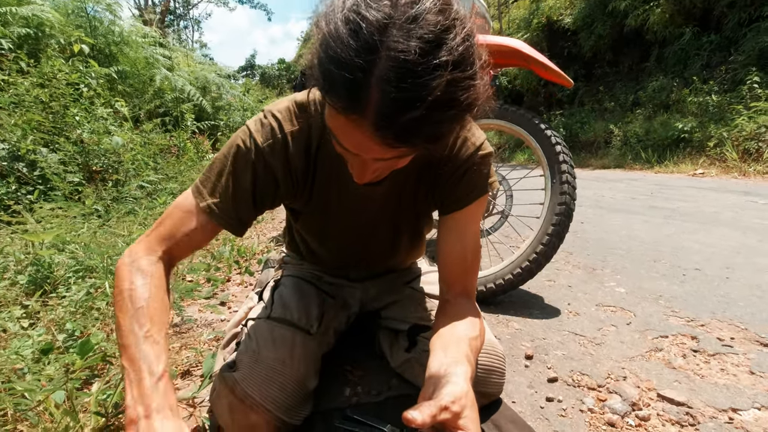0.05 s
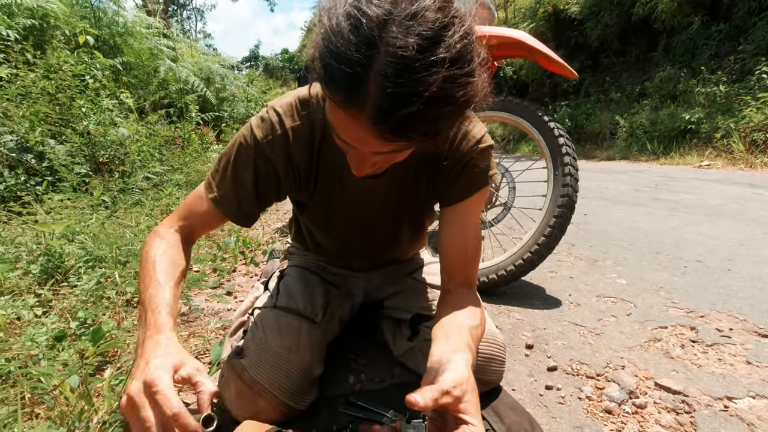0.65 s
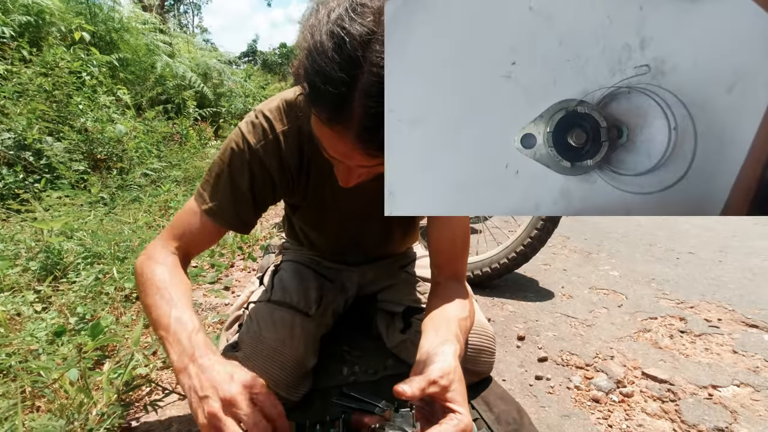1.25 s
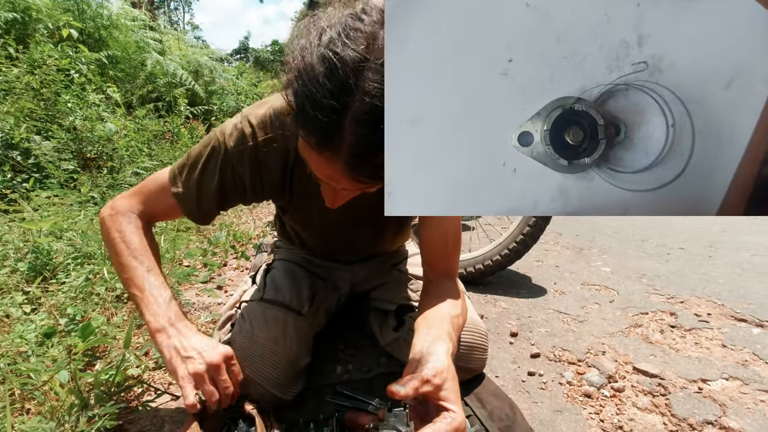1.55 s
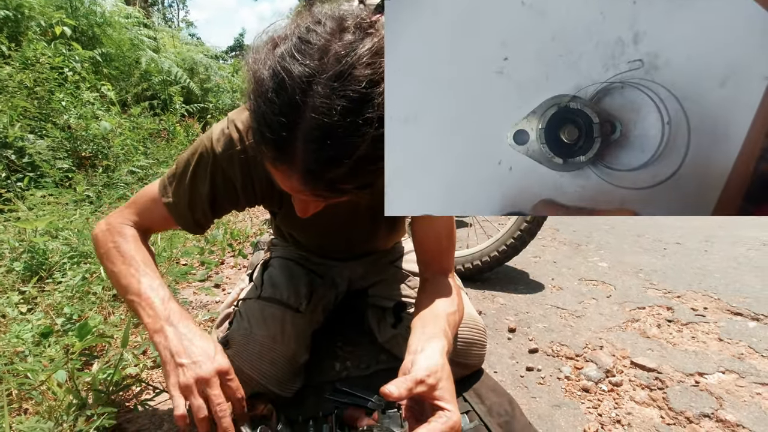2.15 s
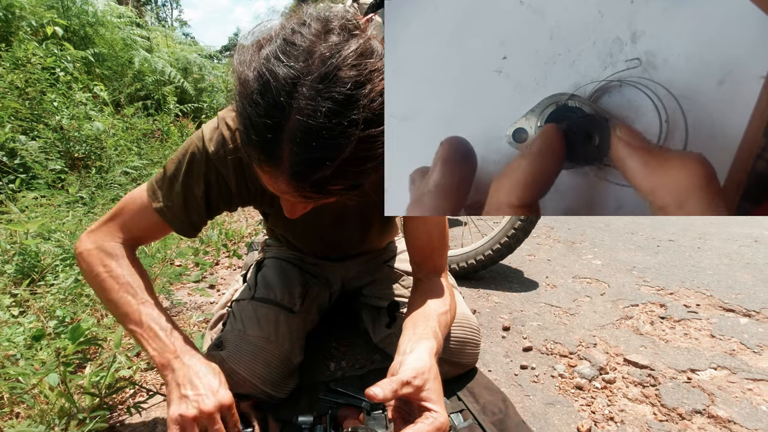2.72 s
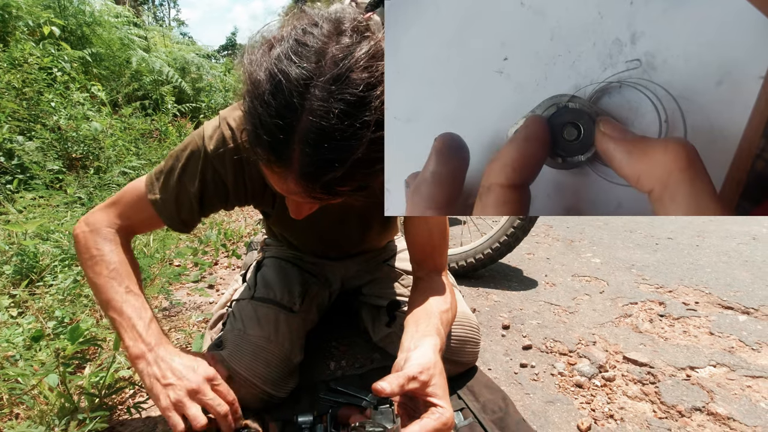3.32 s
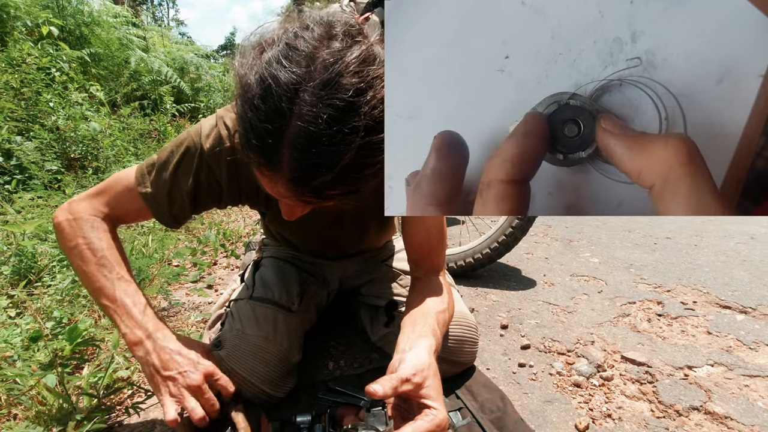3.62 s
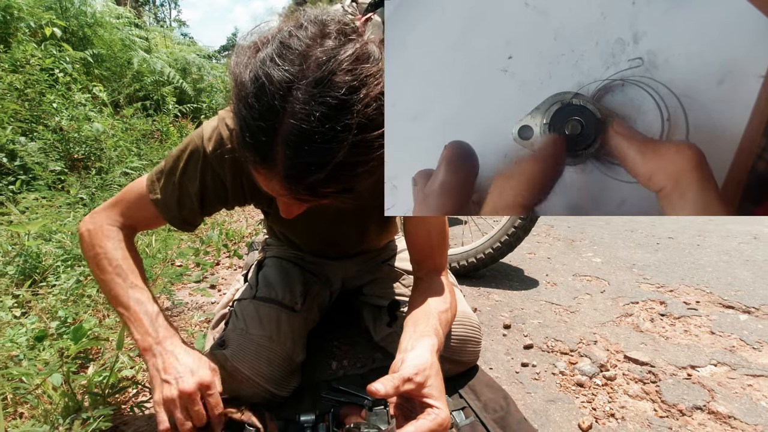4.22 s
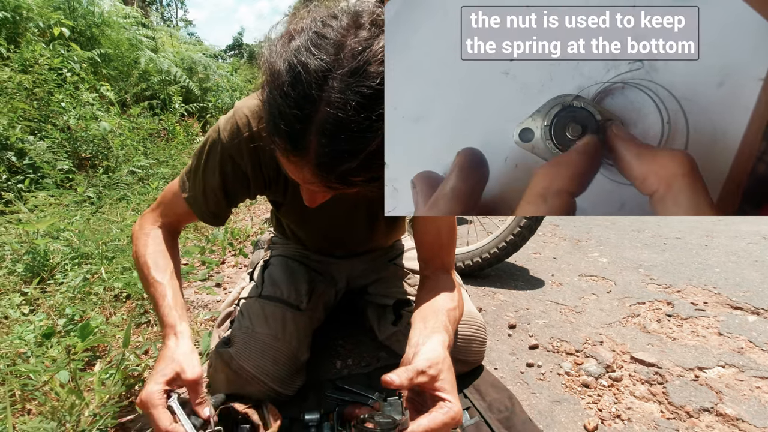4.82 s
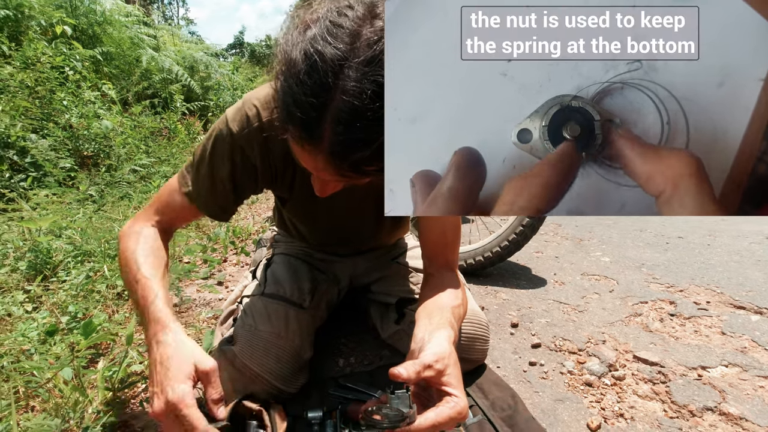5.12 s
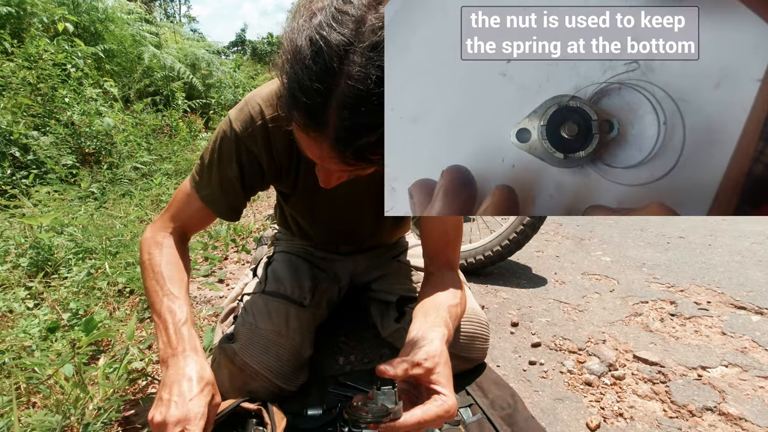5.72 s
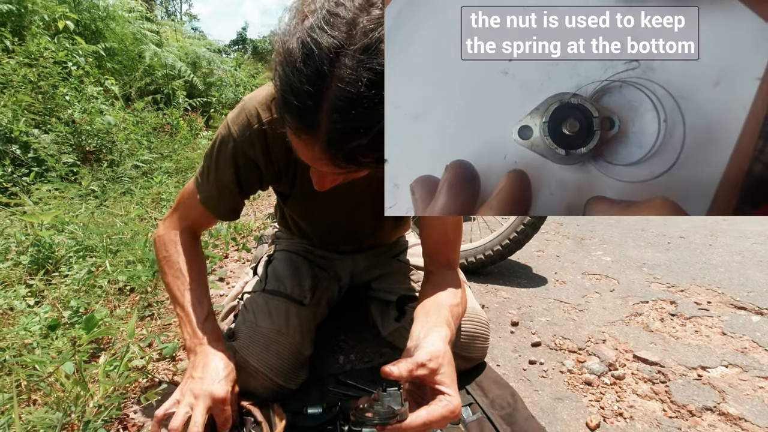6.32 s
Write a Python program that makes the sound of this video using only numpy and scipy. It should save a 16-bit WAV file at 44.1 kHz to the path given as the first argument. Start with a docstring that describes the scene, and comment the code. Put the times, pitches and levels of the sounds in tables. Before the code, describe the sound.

Fingers sort through small steel nuts and washers in a pouch, close to the microphone. A few ticks and a light clink open the sound, followed by a lull in which a far cricket pips three times, very faintly, around 1 second. At about 1.4 seconds the hand bumps softly on the ground and the sorting resumes. From 2 to 5 seconds it is busier: irregular damped clacks, short gritty scrapes and brief high rings, with sharper clinks near 2.6, 3.7 and 4.7 seconds. At about 5.2 seconds something comes down with a hard, hollow knock, the loudest moment, and settles in weakening impacts over a third of a second. From 5.9 to 6.5 seconds the hand rubs the pouch in three soft, dull drags with light taps. Very faint wind and insects continue throughout, with almost no echo.

```python
"""Small steel nuts and washers tick and scrape as fingers sort through them in a pouch, close by.
Parts held in the heap are damped and only clack; those that come free ring briefly in their own modes.
The hand bumps the ground now and then. One load knocks down hard and settles in ever weaker impacts,
and the hand then rubs over the pouch in dull slips of friction.
Behind lies a quiet roadside: light wind, faint insects and three pips of a far cricket."""
import sys
import numpy as np
from scipy import signal
from scipy.fft import rfft, irfft, next_fast_len
from scipy.io import wavfile
from scipy.ndimage import uniform_filter1d, map_coordinates

SR = 44100
rng = np.random.default_rng(int(sys.argv[2]) if len(sys.argv) > 2 else 0)


def master(y):
    """Save y as 16-bit WAV."""
    cut = np.clip(np.atleast_2d(y).T, -1, 1)
    pcm = np.round(cut * 32767)  # scale
    wavfile.write(sys.argv[1], SR, pcm.astype(np.int16))


N = 289277


def amp(db):
    """Amplitude ratio of a level in decibels."""
    return 10 ** (np.asarray(db) / 20)


def unit(x):
    """Normalisation to rms 1."""
    return x / np.sqrt(np.mean(x ** 2) + 1e-20)


def along(points, hz):
    """Interpolation of (f/Hz, value) points on a logarithmic frequency axis."""
    f, values = np.transpose(points)
    return np.interp(np.log(hz + 1), np.log(f + 1), values)


def wobble(rate):
    """Slow random modulation: a spline through `rate` random values a second."""
    knots = rng.standard_normal(int(N * rate / SR) + 4)
    return map_coordinates(knots, [np.arange(N) * rate / SR])


def filtered(x, response):
    """Linear filtering: the spectrum is multiplied by a frequency response."""
    size = next_fast_len(N + SR // 4)
    return irfft(rfft(x, size) * response(np.fft.rfftfreq(size, 1 / SR)), size)[..., :N]


def add(track, s, sound):
    """Superposition of a sound on the track from time s."""
    start = round(s * SR)
    track[:, start:start + sound.shape[1]] += sound[:, :N - start]


# Likeness of left and right: f/Hz, coherence
COHERENCE = [(30, 0.25), (110, 0.5), (280, 0.76), (1500, 0.78), (3000, 0.35), (5000, 0.17), (12000, 0.18)]

def spread(pair, hz):
    """Partial coherence: two independent spectra mix as mid and side into left and right."""
    angle = np.arccos(np.clip(along(COHERENCE, hz), -1, 1)) / 2
    mid, side = pair[0] * np.cos(angle), pair[1] * np.sin(angle)
    return np.array([mid + side, mid - side])


# Phase lead of the left microphone port over the right: f/Hz, phase/rad
PORT_LEAD = [(300, 0), (1300, -.35), (2900, 1.15), (4100, 1.5), (5500, .8), (7100, 1.4), (7700, 2.7),
             (9050, 1.4), (10300, 1.9), (12700, 2.7), (14000, 1.8), (15300, 2.1)]

def aside(x, offset, width):
    """Phase difference: a source off to one side reaches the two ports out of step."""
    centre = x.mean(axis=0)
    image = centre + width * (x - centre)
    return filtered(image, lambda hz: np.exp(.5j * offset * along(PORT_LEAD, hz) * np.array([[1], [-1]])))


def coloured(pair, spectrum, patchy_db=0):
    """Spectral shaping: two independent signals become stereo of rms 1, with passing resonances."""
    hz, _, z = signal.stft(pair, SR, nperseg=1024)
    patches = uniform_filter1d(rng.standard_normal(z.shape[1:]), size=7, axis=0)
    patches = unit(uniform_filter1d(patches, size=4, axis=1))
    z = spread(z.transpose(0, 2, 1), hz) * amp(along(spectrum, hz) + patchy_db * patches.T)
    return unit(signal.istft(z.transpose(0, 2, 1), nperseg=1024)[1][:, :N])


def stick_slip(rate, scatter_db, hiss):
    """Stick-slip friction: random impulses of uneven size over the noise of smooth sliding."""
    slips = (rng.random(N) < rate / SR) * amp(scatter_db * np.clip(rng.standard_normal(N), -2, 2))
    return unit(slips * rng.choice([-1, 1], (2, N))) + hiss * rng.standard_normal((2, N))


def strokes(rows, attack_s, sag_db_per_s, release_t60, linger_db, linger_t60):
    """Exponential envelopes: strokes swell, sag, die away and add in power; one gain per level column."""
    grid = np.arange(0, N / SR, .001)
    start, length, *levels = np.transpose(rows)[:, :, None]
    t = grid - start
    after = np.maximum(t - length, 0)
    push = amp(60 * np.minimum(t, 0) / attack_s - sag_db_per_s * np.clip(t, 0, length))
    shape = push * (amp(-60 * after / release_t60) + amp(linger_db - 60 * after / linger_t60))
    return [np.interp(np.arange(N) / SR, grid, np.linalg.norm(amp(db) * shape, axis=0)) for db in levels]


def impact(spectrum, tilt_db, rattle, t60, hollow_hz=1000, hollow_db=0, ripple_db=4.0,
           settle_db=-17, settle_t60=0.19, size=4096):
    """Source and filter: an impulse and a decaying rattle excite a body that varies each time; peak 1."""
    hz, t = np.fft.rfftfreq(size, 1 / SR), np.arange(size) / SR
    force = rng.standard_normal((2, size)) * (amp(-60 * t / t60) + amp(settle_db - 60 * t / settle_t60))
    force *= rattle / np.linalg.norm(force[0])
    force[0, 0] += 1
    octaves = np.log2(np.maximum(hz, 500) / hollow_hz)
    hollow = np.exp(-(octaves / 0.15) ** 2)
    ripple = unit(uniform_filter1d(rng.standard_normal(len(hz)), size=40))
    body_db = along(spectrum, hz) + tilt_db * octaves + hollow_db * hollow + ripple_db * ripple
    cepstrum = irfft(np.log(amp(body_db)))
    body = np.exp(rfft(2 * cepstrum[:size // 2], size))  # minimum phase, hence causal
    fade = np.cos(.5 * np.pi * t / t[-1])
    sound = irfft(spread(rfft(force), hz) * body) * fade
    return sound / np.abs(sound).max()


# Low rumble of light wind and of the handling: t/s, level/dB
LOW_RUMBLE = [(0.0, -70), (0.6, -73.5), (1.11, -64.5), (2.7, -75), (2.92, -75), (3.1, -67), (3.27, -80),
              (3.53, -70.5), (3.63, -69.5), (4.05, -74), (4.64, -66), (5.11, -67), (5.54, -79), (6.56, -83)]
# Spectra of still air, rumble and insects: f/Hz, level/dB
AIR_SPECTRUM = [(88, -29), (150, -0.5), (296, -8.5), (388, -5.5), (583, -6.5), (751, -8.5), (1630, -9.5),
                (2650, -15.5), (5230, -21), (6350, -18.5), (7710, -26.5), (12000, -32), (13000, -37),
                (15500, -36)]
RUMBLE_SPECTRUM = [(12, -32.5), (20, 14), (42, 13.5), (134, -1.5), (259, -8), (300, -9), (390, -35.5),
                   (660, -120)]
INSECT_SPECTRUM = [(2000, -67), (2600, -6), (2900, -8.5), (3200, -11), (3800, -51)]

def roadside(air_db=-74, insects_db=-79):
    """Shaped noise: still air, a low rumble of light wind and handling, and far, wavering insects."""
    swell = amp(np.interp(np.arange(N) / SR, *np.transpose(LOW_RUMBLE)))
    air = amp(air_db) * coloured(rng.standard_normal((2, N)), AIR_SPECTRUM, patchy_db=4.5)
    rumble = swell * amp(3 * wobble(9)) * coloured(rng.standard_normal((2, N)), RUMBLE_SPECTRUM)
    chorus = amp(1.5 * wobble(5)) * coloured(rng.standard_normal((2, N)), INSECT_SPECTRUM, patchy_db=3)
    return air + rumble + amp(insects_db) * chorus


# Damped contacts in the heap: t/s, level/dB, tilt/(dB per octave), hollow resonance f/Hz
HEAP_CONTACTS = [(.032, -34.5, -7.5, 3100), (.04, -35, -5.5, 3190), (0.153, -37.5, 3.5, 2900),
                 (1.343, -41, -7.5, 820), (1.546, -36, -1.5, 3320), (1.554, -44, -3.5, 3230),
                 (1.716, -36.5, -6, 1740), (1.749, -37.5, -5.5, 3300), (1.875, -47, -2, 3800),
                 (2.114, -31.5, -4.5, 2376), (2.193, -21, 2, 3160), (2.434, -29, -4, 935),
                 (2.4504, -18.5, -1, 2350), (2.462, -35, 0.5, 2600), (2.647, -30, -5.5, 2544),
                 (2.718, -32, -8.5, 2394), (2.94, -35.5, -6, 2610), (3.017, -27, 5, 809),
                 (3.043, -29, 2.5, 2230), (3.055, -29, -6, 1907), (3.201, -24.5, 3, 804),
                 (3.219, -29.5, -3.5, 820), (3.267, -35.5, 4.5, 2246), (3.566, -32.5, -0.5, 2850),
                 (3.576, -28, 0, 2330), (3.738, -29.5, 0, 2670), (3.991, -24.5, -2, 4500),
                 (4.015, -25, 4.5, 3440), (4.055, -29, 1, 3276), (4.075, -36.5, 1.5, 3290),
                 (4.101, -26.5, 6, 2590), (4.195, -34, -2, 3480), (4.515, -31, -1.5, 2490),
                 (4.544, -29.5, -2, 2985), (4.624, -31, -2, 1161), (4.656, -27, 6.5, 2540),
                 (4.83, -29.5, 1, 2460), (5.517, -41, -4.5, 2545)]
# Spectrum of a damped contact: f/Hz, level/dB
TICK_SPECTRUM = [(60, -28), (450, -18.5), (850, -0.5), (1400, -1.5), (2400, 4), (3400, 6.5), (5000, -1.5),
                 (7800, -3.5), (11000, -39), (15500, -12.5)]

def ticks(scrape, small_db=7, scatter_db=3, small_tilt_db=-3, low_hz=800, high_hz=3500, count=45):
    """Damped impact: pinched parts clack on a hollow note; small random clacks follow the scraping."""
    out, small = np.zeros((2, N)), []
    activity = np.cumsum(np.sqrt(scrape))
    for moment, size, note in rng.random((count, 3)):
        i = np.searchsorted(activity, moment * activity[-1])
        db = 20 * np.log10(scrape[i]) + small_db + scatter_db * (2 * size - 1)
        small.append((i / SR, db, small_tilt_db, low_hz + note * (high_hz - low_hz)))
    for s, db, tilt_db, hz in HEAP_CONTACTS + small:
        clack = impact(TICK_SPECTRUM, tilt_db, rattle=1.89, t60=0.033, hollow_hz=hz, hollow_db=8.5)
        add(out, s, amp(db) * clack)
    return out


# Finger strokes through the heap: t/s, duration/s, scrape level/dB, grit level/dB
FINGER_STROKES = [(.035, .02, -52, -64), (.155, 0.048, -50, -54.5), (1.345, .01, -57, -85),
                  (1.55, .05, -55, -65), (1.7, 0.1, -57, -63), (2.115, 0.078, -55.5, -67),
                  (2.195, 0.018, -44, -49.5), (2.26, .13, -55.5, -60.5), (2.445, .02, -48, -59),
                  (2.648, .015, -48, -55), (2.69, .04, -52.5, -82), (2.8, .05, -62.5, -90),
                  (2.94, .06, -48.5, -60), (3.035, .1, -43.5, -46), (3.15, .12, -44, -50),
                  (3.38, 0.091, -63, -99), (3.53, .05, -54.5, -59.5), (3.6, .13, -47.5, -51.5),
                  (3.89, .08, -54.5, -63), (3.995, 0.1, -51, -52.5), (4.197, .03, -57, -77),
                  (4.517, .04, -42.5, -44), (4.65, .1, -45.5, -46), (4.82, 0.031, -43.5, -46.5),
                  (4.89, 0.12, -54.5, -72), (5.125, .025, -52.5, -54), (5.195, .04, -41.5, -54.5),
                  (5.52, 0.074, -58, -83.5)]

def fingers():
    """Amplitude modulation: the strokes set one envelope for the scrape and one for the grit."""
    return strokes(FINGER_STROKES, attack_s=.075, sag_db_per_s=26, release_t60=.2,
                   linger_db=-15.5, linger_t60=1.0)


# Spectra of steel sliding on steel: f/Hz, level/dB
SCRAPE_SPECTRUM = [(35, -41.5), (60, -13), (108, 0.5), (183, -11), (267, -1.5), (489, -14.5), (701, -4),
                   (815, 1.5), (1020, -6), (2530, -1), (3630, -4.5), (4060, -10), (5500, -34.5),
                   (7150, -24), (12100, -120)]
GRIT_SPECTRUM = [(2500, -23.5), (4500, 6.5), (7800, 9.5), (9000, 0), (10700, 3), (11800, -29), (13500, 1.5),
                 (15500, -41.5)]

def stirring(scrape, grit, scrape_db=-3):
    """Stick-slip friction of steel: the same slips drive a coarse scrape and the bright grit on top."""
    slips = stick_slip(rate=1400, scatter_db=3.8, hiss=.7) * amp(1.5 * wobble(90))
    coarse = amp(scrape_db) * scrape * coloured(slips, SCRAPE_SPECTRUM, patchy_db=3.0)
    bright = grit * coloured(slips, GRIT_SPECTRUM, patchy_db=6.0)
    return coarse + bright


# Natural modes of each steel part, by name: f/Hz, level/dB, t60/s
PART_MODES = { "big washer": [(2884, -5, 0.042), (5350, -26.5, 0.077), (5942, 1, 0.18), (9930, -9.5, 0.33),
              (10235, -1.5, 0.16), (14900, -13, .16)], "wide washer": [(3000, -2, .2), (3280, -1.5, 0.35),
              (9900, -11.5, 0.3)], "flat washer": [(5510, -13, 0.067), (10275, 1.5, 0.14),
              (15400, -18.5, 0.13)], "thin washer": [(2875, -6, .3), (9040, 0, .45)],
              "lock washer": [(5175, 1.5, 0.052), (13400, -6.5, .15)], "loose washer": [(2840, -7, 0.22)],
              "spacer": [(3680, 2.5, 0.032), (9300, -21, .15)], "nut": [(12670, 11, 0.12),
              (13620, -13.5, .15), (15100, -18.5, 0.094)], "cap nut": [(12620, -2, 0.26),
              (13631, -20, 0.13), (15300, -24, 0.097)], "pinched washer": [(1790, -7.5, 0.023),
              (3290, 4, 0.01), (4170, -9, 0.017)], "thick nut": [(12600, -13.5, 0.084), (13400, -6.5, .17),
              (12780, 3, 0.12), (15000, -16.5, .18)], "small nut": [(13500, -6, .22), (13935, 3, .24),
              (14901, -13, .27)], "tiny nut": [(13550, -3, 0.16), (14400, -3, .22), (15000, -2.5, 0.21)],
              "bolt": [(2893, -18.5, 0.026), (4000, -17, 0.014), (7150, 3.5, 0.063), (10476, -23.5, 0.11),
              (13900, -23.5, .09)], }

def jingle(grit, level_db=-3, scatter_db=3, t60_ratio=0.13, count=110):
    """Contact damping: parts jostled at random, as hard as the fingers stir, are soon stilled by the heap."""
    out, t = np.zeros((1, N)), np.arange(SR // 6) / SR
    for modes in PART_MODES.values():
        ring = sum(amp(db - 60 * t / (t60_ratio * t60)) * np.sin(2 * np.pi * hz * t)
                   for hz, db, t60 in modes)
        ring = ring[None] / np.abs(ring).max()
        onsets = rng.integers(N, size=count)
        levels = level_db + scatter_db * np.clip(rng.standard_normal(count), -2, 2)
        for i, db in zip(onsets, levels):
            add(out, i / SR, amp(db) * grit[i] * ring)
    return out


def ringing(contacts, hz, t60, rise_s):
    """Damped resonator: one mode builds up and decays after each contact; complex, peak 1."""
    turn = np.exp(2j * np.pi * hz / SR)
    poles = [turn * amp(-60 / t60 / SR), turn * np.exp(-1 / rise_s / SR)]
    ring = signal.lfilter([1], np.poly(poles), contacts)
    return ring / np.abs(ring).max()


# Strikes on freed parts: t/s, part, level/dB, chatter duration/s
FREE_STRIKES = [ (0.153, "big washer", -33.5, .05), (0.192, "thin washer", -42.5, .01),
                (.357, "loose washer", -62, 0.082), (1.569, "nut", -53, .004),
                (1.581, "pinched washer", -39, .0006), (1.649, "wide washer", -52.5, 0.045),
                (1.654, "thin washer", -61, .01), (1.736, "flat washer", -60, 0.014),
                (2.194, "nut", -45, .004), (2.195, "small nut", -41, .003),
                (2.221, "thin washer", -46, 0.0025), (2.225, "flat washer", -46, 0.025),
                (2.25, "nut", -51, .04), (2.324, "flat washer", -60, .08),
                (2.353, "small nut", -46.5, 0.022), (2.51, "small nut", -51.5, 0.02),
                (2.652, "bolt", -22, 0.0038), (2.717, "bolt", -42.5, .003), (3.055, "tiny nut", -42, .02),
                (3.129, "tiny nut", -39, 0.035), (3.192, "thick nut", -44, .08),
                (3.242, "lock washer", -50, 0.022), (3.37, "loose washer", -47, 0.014),
                (3.573, "big washer", -44.5, .003), (3.596, "tiny nut", -35.5, .015),
                (3.598, "flat washer", -33.5, 0.0081), (3.603, "big washer", -34.5, 0.028),
                (3.646, "nut", -40.5, .005), (3.686, "thin washer", -38, .04),
                (3.696, "flat washer", -32.5, 0.0057), (3.737, "cap nut", -24, .012),
                (3.803, "thin washer", -52.5, .03), (3.885, "wide washer", -42, 0.012),
                (4.015, "nut", -41.5, .015), (4.051, "pinched washer", -30, .001),
                (4.558, "big washer", -33, 0.041), (4.589, "flat washer", -30, .004),
                (4.726, "lock washer", -37, .003), (4.73, "thick nut", -20, 0.0048),
                (4.781, "lock washer", -36.5, 0.011), (4.82, "lock washer", -34.5, 0.018),
                (4.838, "small nut", -34, 0.041), (4.897, "small nut", -40, .005),
                (4.901, "spacer", -38.5, .006), (4.948, "big washer", -49.5, .025),
                (5.057, "lock washer", -57, .006), (5.083, "lock washer", -49.5, .025),
                (5.212, "big washer", -37, 0.0044), (5.903, "loose washer", -54, 0.009),
                (6.162, "loose washer", -50, 0.014), ]
# Parts that ring a little nearer the centre: names
INNER_PARTS = ("cap nut", "small nut", "thin washer")

def clinks(level_db=-1, chatter=0.18, chatter_per_s=900, free_s=0.035, grip_t60=0.29,
           neighbour_db=-19, neighbour_t60=0.019, inner_share=0.72):
    """Modal vibration: a freed part is struck, chatters and rings until the fingers close on it."""
    out, t = np.zeros((2, N)), np.arange(SR // 3) / SR
    for s, part, db, length in FREE_STRIKES:
        touching = (rng.random(len(t)) < chatter_per_s / SR) & (t < length)
        contacts = chatter * touching * rng.standard_normal(len(t))
        contacts[0] = 1
        grip = amp(-60 * np.maximum(t - length - free_s, 0) / grip_t60)
        # the parts that it touches answer briefly at pitches of their own
        top_hz = max(PART_MODES[part])[0]
        neighbours = [(hz, neighbour_db, neighbour_t60) for hz in rng.uniform(.55, 1.2, size=4) * top_hz]
        for hz, mode_db, t60 in PART_MODES[part] + neighbours:
            # the part rocks as it rings, so each mode flutters
            rocking = 1 + .3 * np.sin(2 * np.pi * (rng.uniform(25, 110) * t + rng.random()))
            ring = grip * rocking * ringing(contacts, hz, t60, rise_s=.0013)
            lead = along(PORT_LEAD, hz) * (inner_share if part in INNER_PARTS else 1) + rng.normal(0, .15)
            stereo = (np.exp(.5j * lead * np.array([[1], [-1]])) * ring).imag
            add(out, s, amp(db + mode_db + level_db) * stereo)
    return out


# Pips of a far cricket: t/s
CRICKET_PIPS = [0.7, 0.91, 1.05]

def cricket(db=-67, hz=2945, width_s=0.014):
    """Tone pulses: a cricket on the verge pips at one pitch under Gaussian envelopes."""
    t = np.arange(N) / SR
    pulses = sum(np.exp(-((t - s) / width_s) ** 2) for s in CRICKET_PIPS)
    return amp(db) * pulses * np.sin(2 * np.pi * hz * t)


# Bumps of the hand on the ground: t/s, level/dB
GROUND_BUMPS = [(1.353, -31.5), (1.464, -44.5), (3.223, -41), (3.63, -43), (4.488, -39)]
# Spectrum of a bump: f/Hz, level/dB
BUMP_SPECTRUM = [(29, -58), (50, -4), (200, -8), (302, -0.5), (599, -16), (830, -18.5), (1410, -28.5),
                 (1860, -21), (3000, -47), (3900, -81), (6600, -120)]

def bumps():
    """Soft impact: the hand on the ground excites mainly low frequencies."""
    out = np.zeros((2, N))
    for s, db in GROUND_BUMPS:
        add(out, s, amp(db) * impact(BUMP_SPECTRUM, 0, rattle=0.59, t60=.05, ripple_db=6.5))
    return out


def snap(s=2.6485, hz=7135, db=-12, length_s=0.001):
    """Abrupt damping: the bolt rings hard for an instant before a finger stops it."""
    out, t = np.zeros((2, N)), np.arange(SR // 20) / SR
    pulse = np.sin(np.pi * np.minimum(t / length_s, 1))
    add(out, s, amp(db) * (pulse * np.sin(2 * np.pi * hz * t))[None])
    return out


# Knocks on the pouch: t/s, level/dB, tilt/(dB per octave)
POUCH_KNOCKS = [(5.147, -18.5, -2), (5.195, -5, -1), (5.197, -10, 2), (5.1987, -7.5, 2.5),
                (5.2228, -10, 0.5), (5.913, -42.5, -2.5), (6.136, -49, -4.5), (6.19, -38.5, -5),
                (6.347, -42, -5.5)]
# Spectrum of a knock: f/Hz, level/dB
KNOCK_SPECTRUM = [(40, -38), (170, -27), (350, -16), (640, -20), (1080, 3), (1450, -7), (1800, -2),
                  (2800, -6), (3800, -18), (5500, -25), (7600, -25), (11000, -42), (15500, -50)]

def knocks():
    """Hard impact: a brief force excites the hollow resonances of the loaded pouch."""
    out = np.zeros((2, N))
    for s, db, tilt_db in POUCH_KNOCKS:
        knock = impact(KNOCK_SPECTRUM, tilt_db, rattle=1.0, t60=.016, ripple_db=1.5,
                       settle_db=-30, settle_t60=.09)
        add(out, s, amp(db) * knock)
    return out


def settling(s=5.23, gap_s=.015, gap_growth=1.25, first_db=-20, loss_db=3.6, tilt_db=1.2, count=7):
    """Dissipation: the dropped load settles in ever rarer, weaker rattling knocks."""
    out = np.zeros((2, N))
    for k in range(count):
        knock = impact(KNOCK_SPECTRUM, tilt_db, rattle=1.7, t60=.035, ripple_db=2,
                       settle_db=-22, settle_t60=.1)
        add(out, s, amp(first_db - loss_db * k) * knock)
        s += gap_s * gap_growth ** k
    return out


# Drags of the hand over the pouch: t/s, duration/s, level/dB
HAND_DRAGS = [(5.89, 0.092, -51.5), (6.145, 0.063, -47.5), (6.355, 0.13, -54.5)]
# Spectrum of the rubbed pouch: f/Hz, level/dB
POUCH_SPECTRUM = [(150, -42), (250, -25), (447, -42), (524, -12.5), (623, -30), (680, -19.5), (1160, 2),
                  (1510, -20.5), (1750, -2), (2620, -11.5), (2980, -10.5), (4230, -31), (8000, -49),
                  (10400, -72), (17600, -120)]

def rubbing(level_db=-5.0, uneven_db=3):
    """Stick-slip friction: the hand drags over the pouch in dull slips under uneven pressure."""
    pressure, = strokes(HAND_DRAGS, attack_s=0.17, sag_db_per_s=30, release_t60=0.095,
                        linger_db=-14.5, linger_t60=0.728)
    slips = stick_slip(rate=350, scatter_db=4, hiss=.5)
    gain = pressure * amp(level_db + uneven_db * wobble(80))
    return gain * coloured(slips, POUCH_SPECTRUM, patchy_db=4.0)


# Decay of the sound scattered by road and bushes: f/Hz, t60/s
SCATTER_DECAY = [(200, 0.25), (2500, 0.98), (6000, 0.35), (14000, 0.18)]

def echo(x):
    """Diffuse scattering: convolution with a noise tail that lasts longest in the middle range."""
    hz, t, z = signal.stft(rng.standard_normal((2, SR // 2)), SR, nperseg=256)
    decay = amp(-60 * t / along(SCATTER_DECAY, hz)[:, None])
    tail = signal.istft(z * decay, SR, nperseg=256)[1]
    return signal.fftconvolve(x, tail / np.linalg.norm(tail[0]), axes=1)[:, :N]


def scene(echo_db=-28):
    """Superposition of the near handling, its faint echo and the roadside."""
    scrape, grit = fingers()
    heap = ticks(scrape) + snap() + stirring(scrape, grit) + jingle(grit)
    pouch = knocks() + bumps() + settling() + rubbing()
    near = clinks() + aside(heap, offset=0.96, width=.8) + aside(pouch, offset=0.81, width=1.0)
    return near + amp(echo_db) * echo(near) + roadside() + cricket()


def record(dry):
    """Band limiting: an ideal low-pass filter removes the highest treble."""
    return filtered(dry, lambda hz: hz < 15900)


dry = scene()
out = record(dry)
master(out)
```